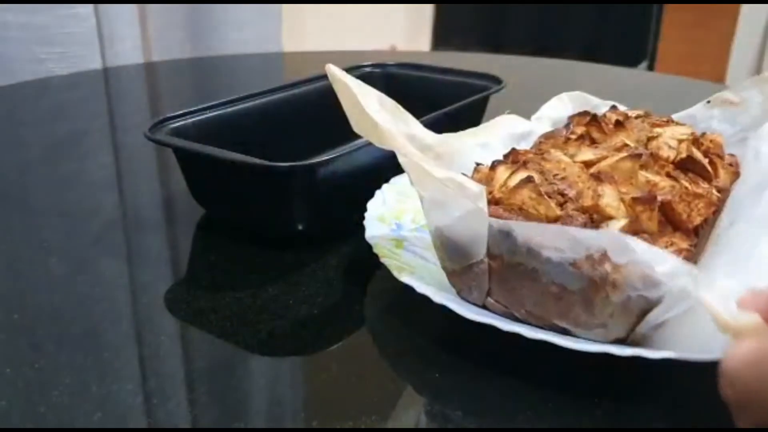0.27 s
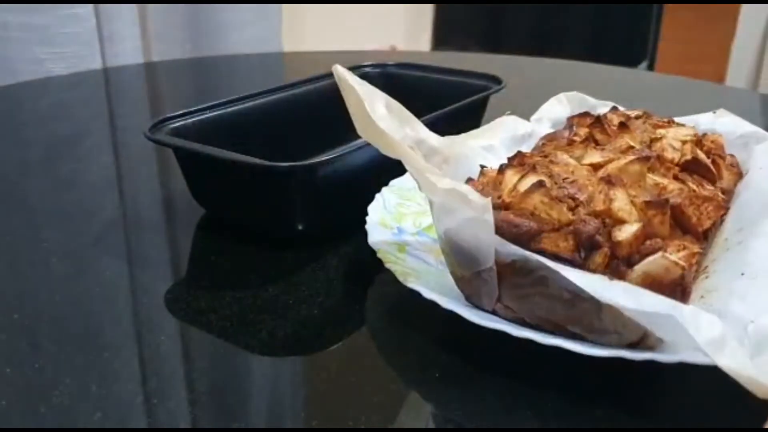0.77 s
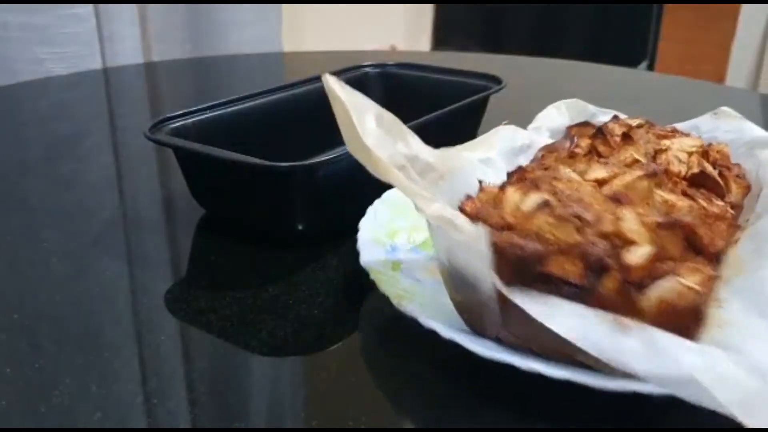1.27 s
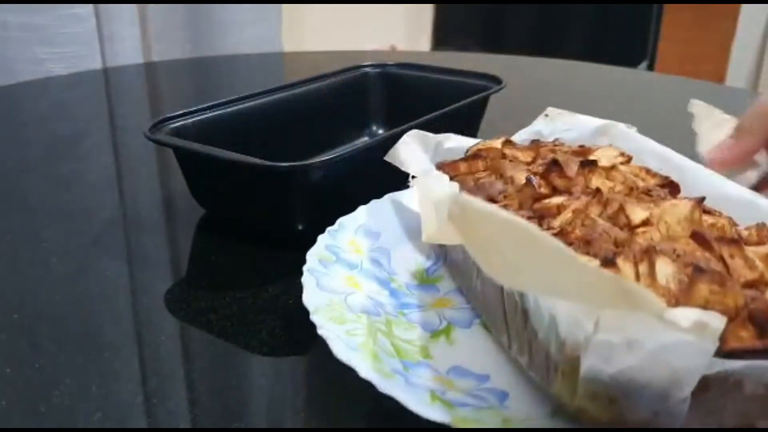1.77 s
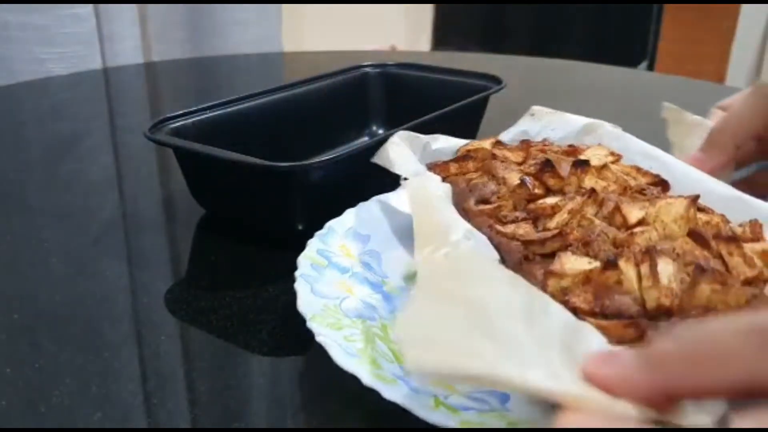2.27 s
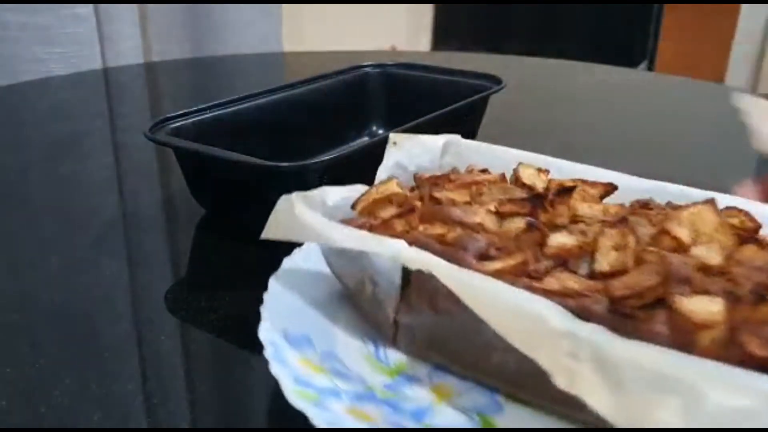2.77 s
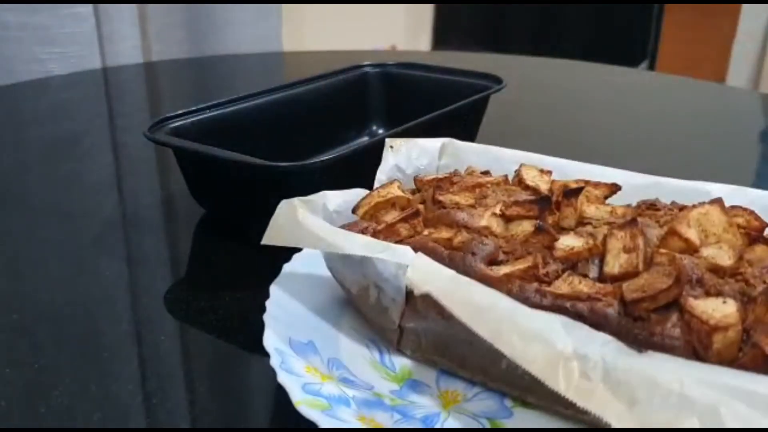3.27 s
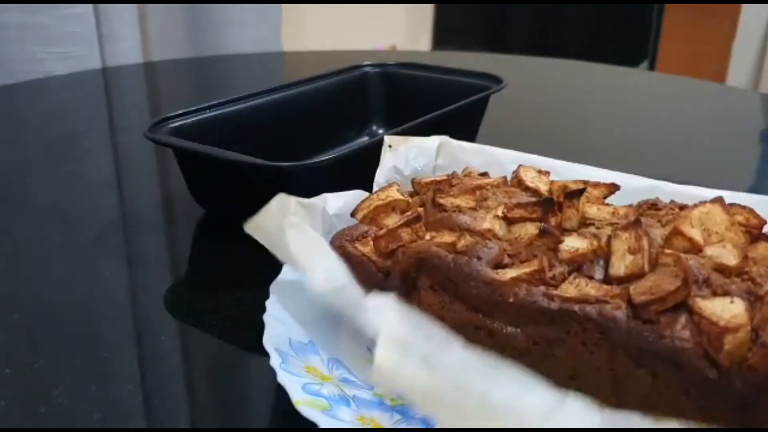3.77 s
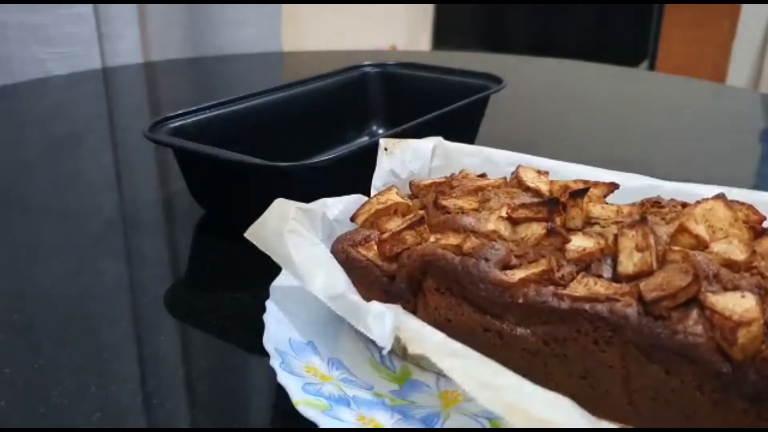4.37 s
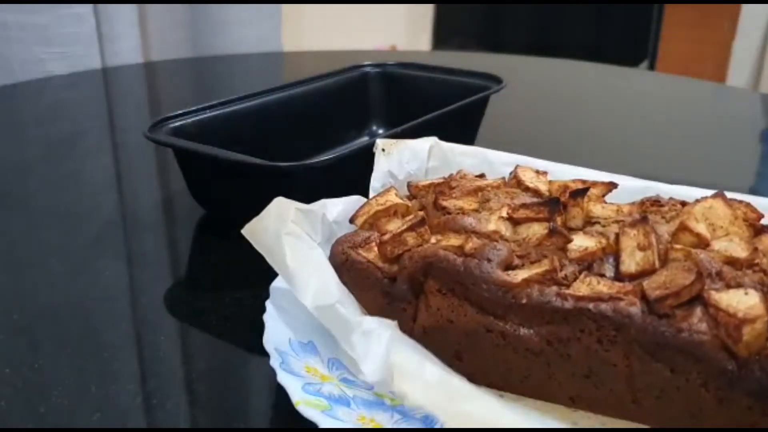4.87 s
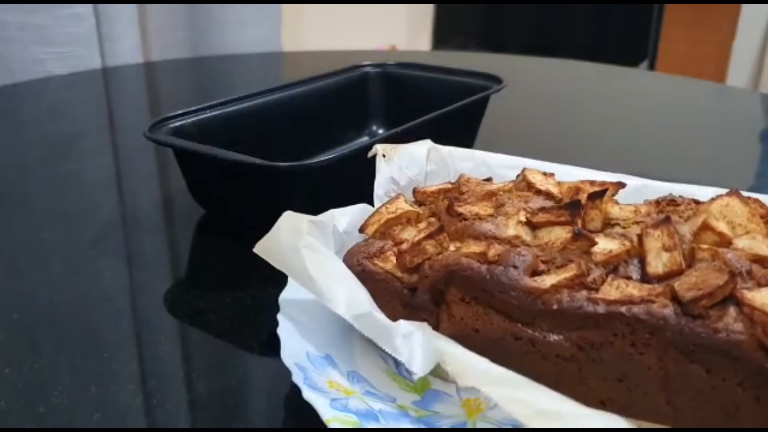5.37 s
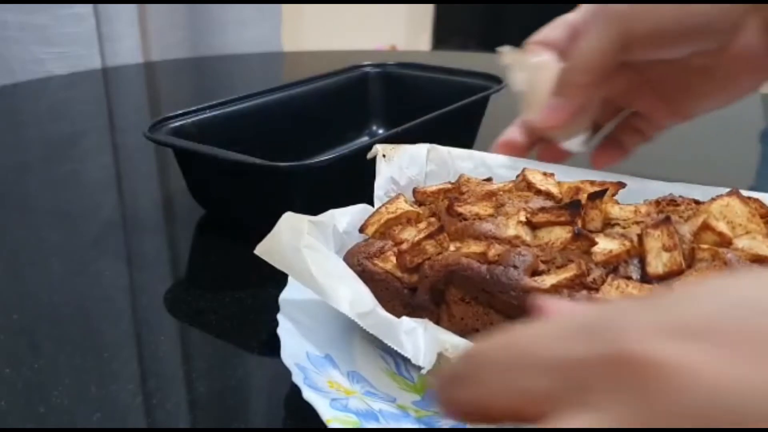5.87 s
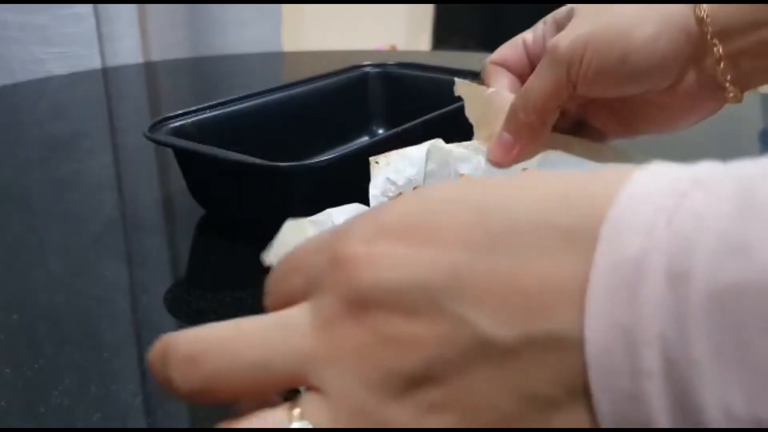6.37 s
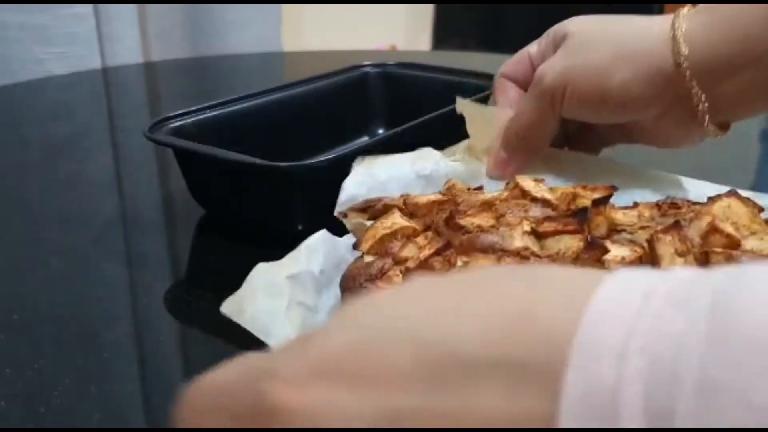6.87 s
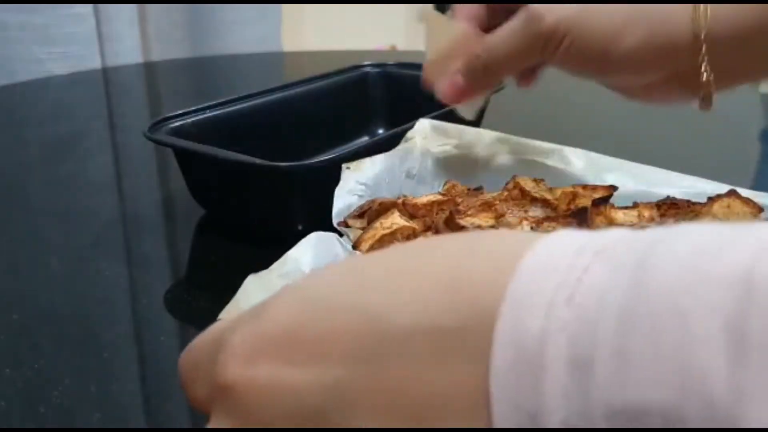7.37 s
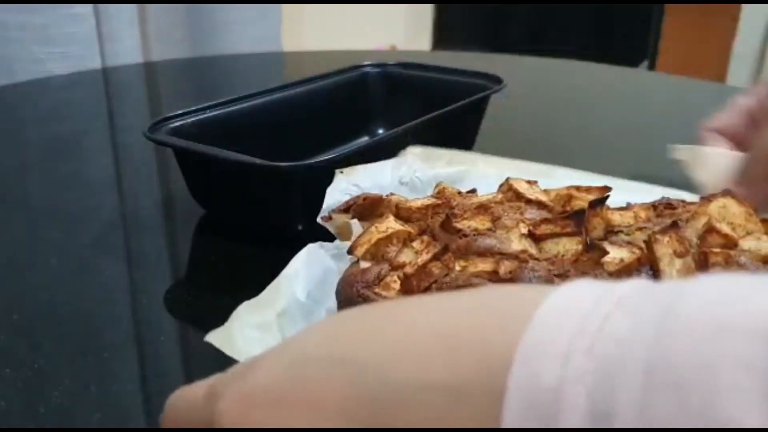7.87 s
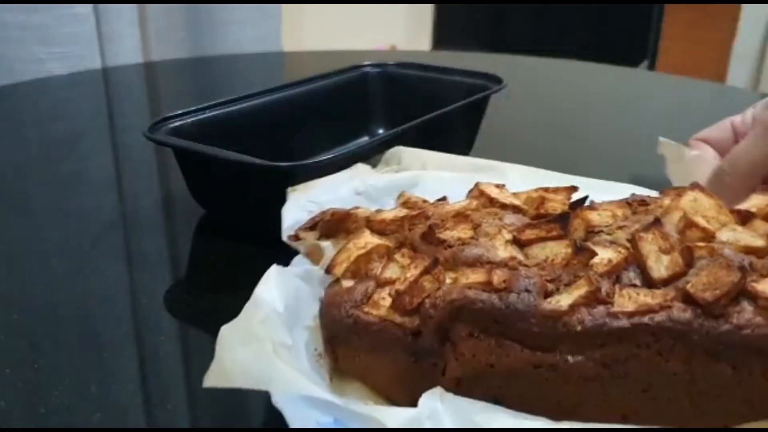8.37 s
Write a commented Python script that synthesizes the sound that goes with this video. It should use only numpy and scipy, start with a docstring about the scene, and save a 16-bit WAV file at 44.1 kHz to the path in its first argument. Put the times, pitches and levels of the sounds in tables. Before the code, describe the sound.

Crisp, dry paper crinkling as parchment is peeled from a cake, sharp creases popping between short pauses in a quiet room.

```python
"""Peeling stiff baking parchment

Hands peel parchment off a loaf cake on a plate, close to the right of a two-port microphone.
Buckling creases snap: each excites a bright, damped crack and a duller pop of the flat paper beside it.
Random trains of small resonant bursts make the crackle, over the hiss of sliding paper.
Shaped noise makes the soft kitchen rumble; sparse decaying echoes make the short tail."""
import sys
import numpy as np
from scipy import signal
from scipy.io import wavfile
from scipy.ndimage import uniform_filter1d

SR = 44100
rng = np.random.default_rng(int(sys.argv[2]) if len(sys.argv) > 2 else 0)


def unload_audio(sound):
    """Save the sound as a 16-bit wav file, at the path given as the first command line argument."""
    columns = np.transpose(np.atleast_2d(sound))
    # keep every value between -1 and 1, then stretch to whole-number steps
    steps = np.round(np.clip(columns, -1, 1) * 32767)
    wavfile.write(sys.argv[1], SR, steps.astype(np.int16))


N = 379436

# Kitchen noise spectrum, relative: frequency_hz, density_db (per Hz)
KITCHEN_SPECTRUM = [(18, -34), (30, 11), (45, 9), (90, 4.5), (125, -7.5), (178, 5.5), (280, -6.5),
                    (370, -8.5), (520, -12), (1300, -27.5), (3900, -36), (9000, -47), (16000, -70)]
# Likeness of the kitchen noise at the two ports: frequency_hz, correlation (0 to 1)
PORT_LIKENESS = [(60, 0.98), (250, 0.98), (1000, 0.25), (4000, .2)]
# Decay of the room: frequency_hz, t60_s
ROOM_DECAY = [(500, 0.19), (2000, 0.28), (8000, 0.18), (15000, 0.024)]
# Hands move from the right to behind the cake and back: time_s, left_lag_samples (left port later)
LEFT_LAG_SAMPLES = [(0, 7), (5.6, 7), (6.4, -6), (7.45, -6), (7.6, 7), (8.6, 3)]
# Left minus right, before the shading factors in scene(): time_s, side_db
SIDE_BALANCE = [(0, -7.5), (5.2, -12.5), (6.2, -7), (7.45, -5), (7.7, -9.5), (8.6, -8.5)]
# Forearm passing across the front, relative to its full effect: time_s, hidden (0 to 1)
FOREARM_COVER = [(5.75, 0), (6.1, 1), (7.4, 1), (8.2, 0)]
# Faint motion of the stiff sheet between pulls, one row each for crackle and flexing: level_db
RESTING_LEVELS = [
    [-69],
    [-61],
]
# Pulls at the sheet: start_s, length_s, first_db, last_db (crackle), flex_db (larger panels re crackle)
SHEET_PULLS = [(0, 0.066, -38, -50.5, -5), (0.107, 0.13, -37, -35, -4), (0.367, 0.13, -39, -36, -3.5),
               (0.577, 0.11, -26.5, -45, -8), (0.702, 0.17, -42, -43, -4), (0.875, 0.072, -30.5, -35.5, -5),
               (1.1, 0.23, -40, -40.5, -5), (1.41, 0.16, -36.5, -46, -3.5), (1.677, 0.0085, -23, -40.5, -6),
               (1.98, 0.058, -49.5, -55, -10), (2.063, 0.24, -31.5, -44.5, -5),
               (2.327, 0.069, -45.5, -37.5, -2), (2.506, 0.069, -50, -57, -5),
               (2.765, 0.069, -40.5, -47, -7), (2.875, 0.062, -68, -57, 3), (3.097, 0.68, -34, -34, -3),
               (3.822, 0.15, -51.5, -36.5, 1), (4.095, 0.041, -33.5, -33.5, -8),
               (4.52, 0.16, -46.5, -45, -6.5), (4.695, 0.18, -32, -31.5, -6.5),
               (4.868, 0.027, -33, -30, -2.5), (5.024, 0.34, -37.5, -41, -8),
               (5.74, 0.16, -57, -43.5, -2.5), (6.041, 0.35, -41.5, -30, -4),
               (6.371, 0.036, -23.5, -29.5, -3.5), (6.442, .4, -38, -41.5, -1.5), (6.91, .2, -50.5, -60, 0),
               (7.118, 0.031, -65, -46.5, -6), (7.461, 0.17, -37, -55, -8.5), (7.752, 0.11, -39, -32, -5),
               (7.984, 0.26, -37, -38.5, -4.5), (8.477, 0.095, -41.5, -60, -10),
               (8.588, .02, -44, -46, -13)]
# Flexing spectrum, relative: frequency_hz, density_db (per Hz)
FLEX_SPECTRUM = [(150, -36.5), (250, 3.5), (530, -9), (920, -1), (1620, 1), (2380, 1), (3500, 4),
                 (4550, -2), (7700, -120)]
# Crack spectrum as the microphone ports colour it, relative: frequency_hz, density_db (per Hz)
CRACK_SPECTRUM = [(1470, -11), (2500, -22.5), (2770, 0), (3920, 0.5), (4550, 2), (7590, -7), (8940, 4),
                  (10700, 1.5), (12200, -0.5), (15200, -1.5), (16000, -6.5)]
# Loud buckling creases; levels precede the growth with length, length_ms scales rise and decay:
# peak_s, crack_db, crack_hz, pop_db, pop_hz, length_ms
CREASE_SNAPS = [(0.1138, -25, 7640, -28, 1700, 4.6), (0.215, -25, 6570, -24, 1500, 4.2),
                (0.226, -20.0, 6560, -19.5, 1530, 2.2), (0.3144, -21.5, 7360, -27, 1140, 1.06),
                (0.377, -19, 4400, -28, 1450, 1.8), (0.4187, -25, 4850, -38, 1960, 1.4),
                (0.4739, -23.5, 7450, -26, 1800, 3.2), (0.5556, -15, 5360, -24.0, 1500, 1.4),
                (0.5626, -32, 5810, -11.5, 1480, 1.15), (0.618, -24, 3860, -36.0, 1360, 3.4),
                (0.6907, -11, 9200, -25, 2190, 0.75), (0.7665, -23, 8700, -31.5, 2490, 1.2),
                (0.8082, -28, 6530, -34, 2110, 4), (0.9573, -19.0, 7060, -18.5, 1720, 3.2),
                (1.053, -13.5, 3700, -15.5, 2390, 0.93), (1.1127, -15.5, 3040, -11.5, 1590, 1.4),
                (1.1396, -19, 3380, -7, 1160, 1.5), (1.1597, -19, 6000, -26, 2550, 2.4),
                (1.1819, -19, 9450, -43, 1440, 0.88), (1.1955, -17, 4100, -7, 1490, 1.57),
                (1.292, -22, 5100, -23, 1830, 1.1), (1.359, -27, 4340, -40, 2230, 1.4),
                (1.4042, -25.5, 8600, -47, 1890, 0.99), (1.4671, -22, 7780, -22, 1940, 0.87),
                (1.4917, -21, 4500, -26, 1930, 1.3), (1.5135, -25, 8900, -50, 1280, 1.7),
                (1.572, -16, 10880, -29, 970, 1.24), (1.5866, -26.5, 4630, -23.5, 1940, 2.7),
                (1.6416, -26.5, 8940, -36, 1780, 1.2), (1.9127, -39, 3340, -49, 1450, 1.2),
                (1.992, -36, 6600, -40, 2140, 3.4), (2.0218, -34, 6950, -33, 1760, 1.6),
                (2.1173, -19.5, 4610, -18.5, 1500, 1.1), (2.1922, -22.5, 5330, -13.5, 1300, 1.37),
                (2.2915, -32.5, 8210, -23.5, 1550, 1.3), (2.37, -27, 5450, -20.5, 1330, 1.6),
                (2.3859, -23, 4210, -11.5, 1470, 0.87), (2.3952, -22, 6550, -12, 1040, 2.3),
                (2.404, -20.5, 3430, -15.5, 1740, 2.5), (2.5764, -21.5, 10900, -42, 1580, 0.8),
                (2.6543, -39.0, 8380, -51.5, 1050, 1.3), (2.7657, -25, 7310, -26.5, 1430, 1.4),
                (2.7817, -19, 9230, -26, 1610, 1.4), (2.8044, -21.5, 6650, -33, 2000, 1.2),
                (2.8953, -32.5, 3630, -44, 2220, 0.97), (3.066, -23.5, 6070, -22, 1540, 1.3),
                (3.1052, -38, 5650, -26, 1190, 3.8), (3.1357, -23, 8500, -29, 1540, 1.7),
                (3.1883, -15.5, 4760, -18, 1530, 2.4), (3.2216, -16.5, 5900, -12.5, 1150, 3.8),
                (3.2383, -19, 6980, -34, 2070, 1.2), (3.2455, -21, 5150, -31, 1890, 1.4),
                (3.2587, -34, 4950, -15, 1290, 1.5), (3.2785, -23, 3570, -27, 1370, 1.4),
                (3.302, -21, 5500, -25, 1730, 1.4), (3.3218, -21.0, 5080, -19, 1700, 2.1),
                (3.3434, -18.5, 8740, -37, 1860, 2.2), (3.3514, -12.5, 5030, -12, 1590, 0.99),
                (3.362, -26, 4820, -24.5, 2240, 1.6), (3.376, -25, 6300, -13, 1350, 1.5),
                (3.397, -17.5, 8700, -18.5, 1900, 2.2), (3.4328, -22.0, 6260, -19, 1720, 1.4),
                (3.501, -17.5, 4150, -13.5, 1370, 1.7), (3.5114, -16, 5800, -9, 1670, 1.1),
                (3.5443, -15.5, 8200, -21, 1480, 2.6), (3.5655, -11.5, 8100, -23, 1770, 1.3),
                (3.6175, -22.5, 7370, -18.5, 1326, 2.6), (3.6594, -20.5, 6200, -18, 2040, 1.9),
                (3.7017, -19.5, 3740, -12, 1800, 2.0), (3.7688, -22.5, 3980, -23.5, 1930, 2.3),
                (3.7832, -9, 8600, -24, 1930, 0.65), (3.851, -21.5, 5720, -23.5, 1910, 2.4),
                (3.8806, -24, 3050, -18.5, 2690, 1.9), (3.9315, -24, 4490, -15, 2160, 3.3),
                (3.9753, -22.5, 3660, -13.5, 1710, 1.7), (4.0009, -22.5, 5550, -30, 1920, 1.9),
                (4.0941, -27, 4710, -18, 1990, 2.2), (4.1339, -18.5, 4770, -21, 1960, 1.8),
                (4.1604, -21, 8620, -25, 1730, 1.6), (4.325, -26, 6240, -21.5, 1810, 1.76),
                (4.4741, -31.5, 11200, -51, 1560, 0.86), (4.5338, -20.5, 8680, -18.5, 1810, 0.68),
                (4.5399, -30, 4600, -25, 1840, 1.3), (4.5478, -26, 3570, -26, 1740, 1.5),
                (4.5831, -24.5, 5020, -23.0, 2020, 1.8), (4.619, -24, 3040, -19, 2680, 1),
                (4.6328, -24.0, 7110, -25.0, 1750, 1.6), (4.6447, -44, 2900, -16, 2470, 2.3),
                (4.6797, -24.0, 8800, -24, 2180, 1.1), (4.7017, -24, 3850, -28.0, 2350, 1.1),
                (4.7141, -14.5, 6400, -15, 2200, 1.7), (4.7328, -23, 5690, -21.5, 1900, 1.2),
                (4.7536, -12.5, 6300, -18, 2310, 1.5), (4.7627, -13.0, 8560, -21, 1730, 0.69),
                (4.8456, -16, 9490, -34, 2430, 0.68), (4.876, -14.5, 8600, -18, 2330, 1.7),
                (4.9115, -32, 3960, -11, 2050, 0.53), (4.9214, -18.5, 6140, -17, 1990, 1.6),
                (5.0138, -14.5, 4400, -19, 2140, 0.47), (5.0466, -25, 7000, -22.5, 2200, 1.6),
                (5.1, -26, 4130, -26, 2640, 1.2), (5.1337, -15.5, 3020, -16, 2450, 1.54),
                (5.1464, -26, 4400, -28, 2490, 1.4), (5.1665, -18.5, 3450, -16.5, 2410, 1.1),
                (5.2097, -16.5, 8900, -16.5, 1880, 1.9), (5.333, -36, 5190, -31.5, 2100, 1.4),
                (5.3744, -20.5, 8930, -21.5, 2200, 1.8), (5.4886, -22, 8600, -33.5, 1510, 0.95),
                (5.6076, -37.5, 4160, -38, 2630, 2.4), (5.617, -35, 8200, -47, 1610, 1.6),
                (5.761, -53, 4190, -30.5, 1780, 1.5), (5.8039, -37.5, 6380, -32.5, 1840, 3.2),
                (5.8498, -29.5, 7890, -28.5, 1310, 1.8), (5.9001, -22.5, 7230, -22.5, 1650, 1.4),
                (6.0383, -25.5, 6230, -25.5, 1870, 2.0), (6.2403, -33, 6760, -20, 1430, 1.2),
                (6.2717, -45, 3680, -31, 2060, 2.6), (6.2957, -35, 3700, -18, 1190, 1.4),
                (6.3936, -16.5, 3400, -19, 2000, 3.5), (6.4583, -36, 3280, -27.5, 740, 2.8),
                (6.536, -27, 4150, -35, 770, 5.8), (6.601, -30.0, 5250, -12, 860, 6.9),
                (6.6385, -23.5, 6330, -21.5, 1100, 1.9), (6.7533, -31.5, 5830, -41, 1660, 2),
                (6.7912, -28, 4460, -35, 1480, 2.2), (6.8306, -27, 7550, -35, 1740, 2.3),
                (6.9095, -34, 4190, -39, 1720, 2.1), (6.9577, -37, 3750, -31.5, 1630, 2.9),
                (7.1403, -37.5, 4550, -41, 1950, 4.1), (7.4475, -47, 3680, -30, 1810, 1.3),
                (7.5038, -31, 5430, -42, 1150, 1.6), (7.554, -31.5, 5140, -29, 1870, 2.9),
                (7.8221, -28.0, 4050, -29, 1800, 3.7), (7.8367, -25, 7140, -30.0, 2090, 1.5),
                (7.886, -21.5, 4310, -21, 2170, 1.6), (7.8959, -20.5, 9140, -24, 2460, 1.4),
                (7.9927, -31, 3320, -24, 2260, 1.9), (8.0083, -14.0, 5650, -11, 2620, 0.99),
                (8.0284, -16.5, 7760, -23.5, 1780, 2.3), (8.0455, -14.0, 8660, -35, 2100, 0.68),
                (8.1226, -29, 6100, -19, 2190, 1.4), (8.1549, -23.5, 8450, -16, 2190, 1.7),
                (8.2792, -26, 5570, -43, 1400, 1.3), (8.3892, -36.5, 8240, -66, 1300, 1.3),
                (8.4596, -29, 4200, -30.5, 1130, 2.0), (8.4841, -45, 7760, -49, 1360, 1.6)]

KITCHEN_DB, TAIL_DB = -42, -10
GRIP_DB_PER_S, SETTLE_DB_PER_S = 532, 146  # a pull comes on fast; the paper settles more slowly
LEAD = 512  # samples of build-up before the peak of a burst
RUMBLE_HZ, EDGE_HZ = 36, 16100  # band limits of the microphone


def gain_of(db):
    """Level law: an amplitude ratio is ten to the power of decibels over twenty."""
    return 10 ** (np.asarray(db) / 20)


def evened(x):
    """Power normalisation: scales a signal to rms 1."""
    return x / np.sqrt(np.mean(x ** 2) + 1e-20)


def read(points, hz):
    """Interpolation along a logarithmic frequency axis."""
    f, value = np.transpose(points)
    return np.interp(np.log(hz + 1), np.log(f + 1), value)


def coloured(x, points):
    """Minimum-phase filtering: a spectrum fixes its causal response, here scaled to energy 1."""
    hz = abs(np.fft.fftfreq(4096, 1 / SR))
    log_gain = np.log(gain_of(np.maximum(read(points, hz), -80)))
    # the Hilbert transform of the log gain yields the phase
    response = np.exp(np.conj(signal.hilbert(log_gain)))
    taps = np.fft.ifft(response).real[:2048]
    return signal.oaconvolve(x, taps[None] / np.linalg.norm(taps), axes=1)[:, :N]


def ring(x, hz, damping):
    """Damped resonance of bandwidth damping x hz, scaled to right-port energy 1; paper rings briefly."""
    radius = np.exp(-np.pi * damping * hz / SR)
    poles = [1, -2 * radius * np.cos(2 * np.pi * hz / SR), radius * radius]
    y = signal.lfilter([1, 0, -1], poles, x)
    return y / np.linalg.norm(y[1])


def burst(noise, rise_s, decay_s, same):
    """Partial coherence: an exponential burst whose ports see partly different faces of the sheet."""
    t = (np.arange(noise.shape[1]) - LEAD) / SR
    same = np.clip(same, 0, 1)
    left = same * noise[1] + np.sqrt(1 - same ** 2) * noise[0]
    envelope = np.exp(np.minimum(t / rise_s, -t / decay_s))
    return np.array([left, noise[1]]) * envelope * signal.windows.tukey(len(t), .3)


def kitchen():
    """Stationary noise with a shaped spectrum: low rumble and faint hiss, wavering in patches."""
    frames, hz = N // 512 + 5, np.fft.rfftfreq(2048, 1 / SR)
    a, b, c, d, patches = rng.standard_normal((frames, 1025, 5)).T
    patches = evened(uniform_filter1d(uniform_filter1d(patches, 5, 0), 8, 1))
    same = np.clip(read(PORT_LIKENESS, hz), -1, 1)[:, None]
    left = a + 1j * b
    right = same * left + np.sqrt(1 - same ** 2) * (c + 1j * d)
    spectrum_db = read(KITCHEN_SPECTRUM, hz)[:, None] + 2.0 * patches
    z = np.array([left, right]) * gain_of(spectrum_db)
    noise = signal.istft(z, nperseg=2048, noverlap=1536)[1][:, :N]
    return gain_of(KITCHEN_DB) * evened(noise)


def room(x, count=3):
    """Reverberation: sparse echoes of random sign from table and walls, dying at a rate set by band."""
    starts, out = np.arange(200, SR // 2 - 20, 20), np.zeros((2, N))
    for k in range(count):
        taps = np.zeros((2, SR // 2))
        at = starts + rng.integers(0, 20, (2, len(starts)))
        np.put_along_axis(taps, at, rng.choice([-1., 1.], at.shape), 1)
        hz, t, z = signal.stft(taps, SR, nperseg=256)
        decay = gain_of(-60 * t / read(ROOM_DECAY, hz)[:, None])
        tail = signal.istft(z * decay, SR, nperseg=256)[1]
        # the sound is shared among the tails in a steady rotation, so the echo pattern keeps changing
        share = np.sqrt(2 / count) * np.cos(np.pi * (9 * np.arange(N) / SR + k / count))
        source = (share * x.mean(0))[None]
        out += signal.fftconvolve(source, tail / np.linalg.norm(tail[0]), axes=1)[:, :N]
    return out


def placed(paper, shading):
    """Interaural-style cues: a delay and a level difference between ports place the paper."""
    t = np.arange(N) / SR
    pan_db = shading * np.interp(t, *np.transpose(SIDE_BALANCE))
    lag = np.round(np.interp(t, *np.transpose(LEFT_LAG_SAMPLES))).astype(int)
    heard = np.clip(np.arange(N) - lag, 0, N - 1)
    return np.array([paper[0, heard] * gain_of(pan_db / 2), paper[1] * gain_of(-pan_db / 2)])


def screened(treble, depth=0.14, hz=6000):
    """Acoustic shadow: a forearm across the front hides the paper and slightly dulls the top."""
    hidden = depth * np.interp(np.arange(N) / SR, *np.transpose(FOREARM_COVER))
    top = signal.sosfiltfilt(signal.butter(2, hz, "high", fs=SR, output="sos"), treble)
    return treble - np.clip(hidden, 0, 1) * top


def handling():
    """Power addition: pulls swell, follow their slopes and settle; gains of crackle and flexing."""
    t, power = np.arange(0, N, 128) / SR, gain_of(RESTING_LEVELS) ** 2
    for start, length, first_db, last_db, flex_db in SHEET_PULLS:
        end = start + length
        db = np.interp(t, [start, end], [first_db, last_db])
        db -= GRIP_DB_PER_S * np.maximum(start - t, 0)
        db -= SETTLE_DB_PER_S * np.maximum(t - end, 0)
        power = power + gain_of([db, db + flex_db]) ** 2
    return [np.interp(np.arange(N) / SR, t, np.sqrt(p)) for p in power]


def crackle(per_s=600, spread_db=4.0, clump=.7, hiss=0.47, count=11):
    """Clustered random impulses: small creases of many sizes pop in clumps over sliding-paper hiss."""
    busy = np.exp(clump * evened(uniform_filter1d(rng.standard_normal(N), 500)))
    size = gain_of(spread_db * np.minimum(rng.exponential(1, N), 3))
    size *= rng.random(N) < per_s * busy / busy.mean() / SR
    kind = rng.integers(0, count, N)
    fine, flex = np.zeros((2, 2, N))
    for k in range(count):
        train, small = (size * (kind == k))[None], k / count  # smaller creases ring higher
        crack = burst(rng.standard_normal((2, 768)), 0.00025, 0.0007, 0.083)
        crack = ring(crack, 3000 * 3.3 ** small, 0.5)
        pop = burst(rng.standard_normal((2, 1024)), 0.0013, 0.0028, 0.67)
        pop = ring(pop, 500 * 6.55 ** small, 0.33)
        fine += signal.oaconvolve(train, crack, axes=1)[:, :N]
        flex += signal.oaconvolve(train, pop, axes=1)[:, :N]
    slide = hiss * rng.standard_normal((2, 2, N))
    fine_gain, flex_gain = handling()
    fine = fine_gain * coloured(evened(fine) + slide[0], CRACK_SPECTRUM)
    return fine, flex_gain * coloured(evened(flex) + slide[1], FLEX_SPECTRUM)


def snaps():
    """Buckling instability: a crease gives way in jerks, exciting a crack and a damped panel pop."""
    cracks, pops = np.zeros((2, 2, N + 2048))
    noise = rng.standard_normal((len(CREASE_SNAPS), 5, 2048))
    for (s, crack_db, crack_hz, pop_db, pop_hz, ms), z in zip(CREASE_SNAPS, noise):
        at = slice(round(s * SR), round(s * SR) + 2048)
        length_s = ms / 1000
        # a longer crease is more jerky
        jerks = gain_of(6.0 * np.tanh(ms / 6) * evened(uniform_filter1d(z[4], 40)))
        size = np.sqrt(length_s * SR)  # energy grows with the length
        crack = burst(z[:2], 0.38 * length_s, 1.11 * length_s, 0.028) * jerks
        cracks[:, at] += gain_of(crack_db) * size * ring(crack, crack_hz, 1.0)
        shake = burst(z[2:4], 0.37 * length_s, 1.11 * length_s, 0.69) * jerks
        pops[:, at] += gain_of(pop_db) * size * ring(shake, pop_hz, 0.47)
    # dropping the lead puts each burst's peak at its time
    return coloured(cracks[:, LEAD:], CRACK_SPECTRUM), pops[:, LEAD:N + LEAD]


def scene():
    """Superposition: the paper, its echo and the kitchen add linearly."""
    cracks, pops = snaps()
    fine, flex = crackle()
    # long waves bend round the microphone and are shaded less
    paper = placed(screened(cracks + fine), 0.57) + placed(pops + flex, 0.49)
    return paper + gain_of(TAIL_DB) * room(paper) + kitchen()


def record(dry):
    """Transducer limits: the deepest rumble is cut, loud snaps saturate softly, then the top is cut."""
    high_pass = signal.butter(3, RUMBLE_HZ, "high", fs=SR, output="sos")
    clipped = np.tanh(signal.sosfilt(high_pass, dry))
    low_pass = signal.firwin(255, EDGE_HZ, window=("kaiser", 9), fs=SR)
    return signal.oaconvolve(clipped, low_pass[None], "same")


dry = scene()
out = record(dry)
unload_audio(out)
```